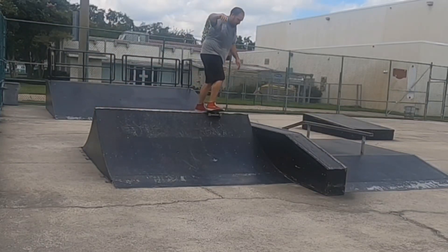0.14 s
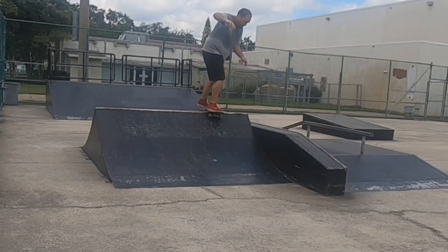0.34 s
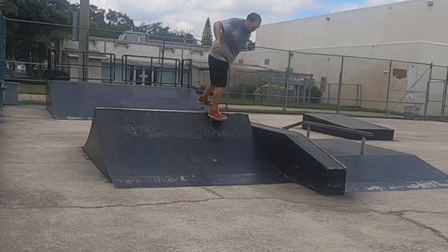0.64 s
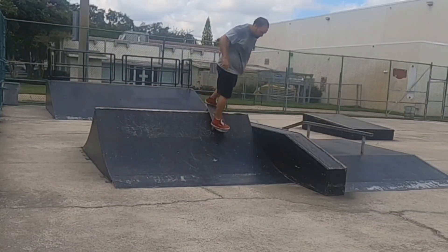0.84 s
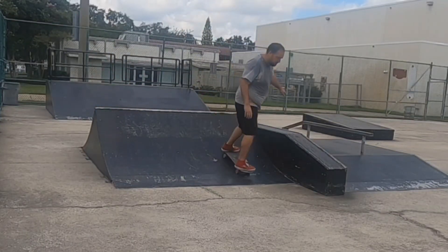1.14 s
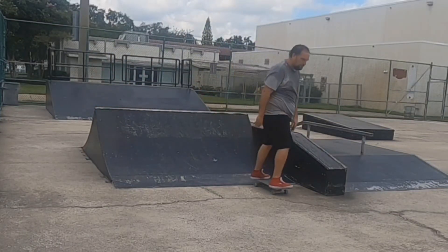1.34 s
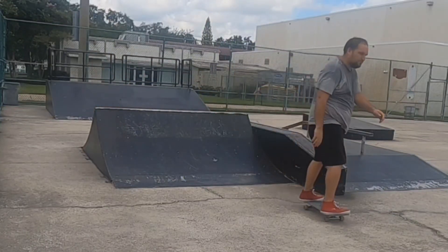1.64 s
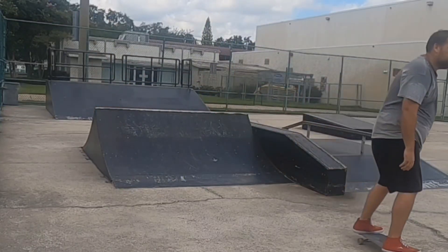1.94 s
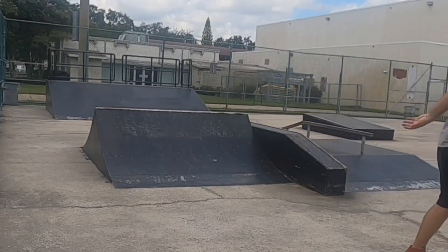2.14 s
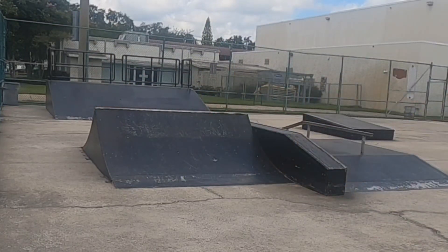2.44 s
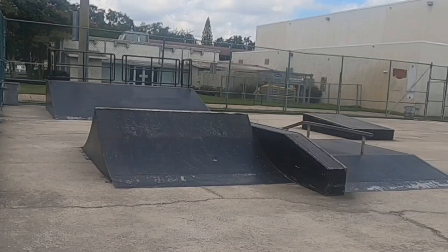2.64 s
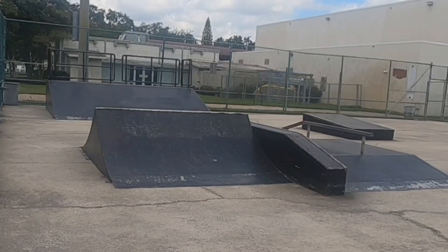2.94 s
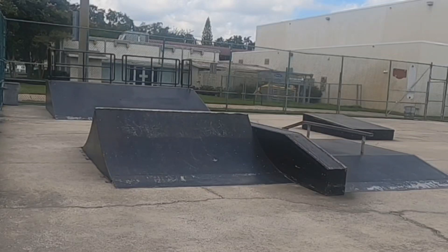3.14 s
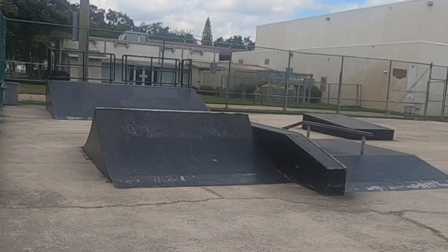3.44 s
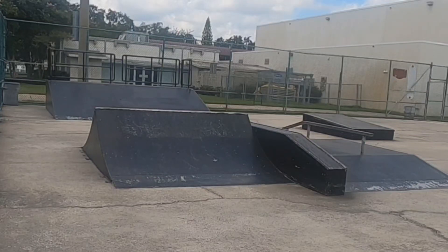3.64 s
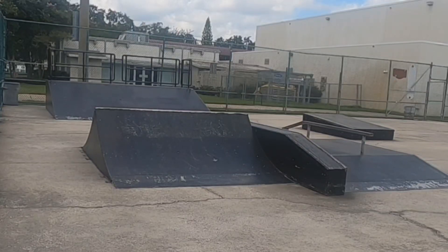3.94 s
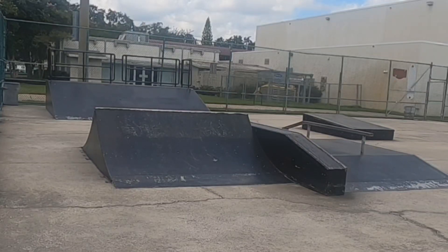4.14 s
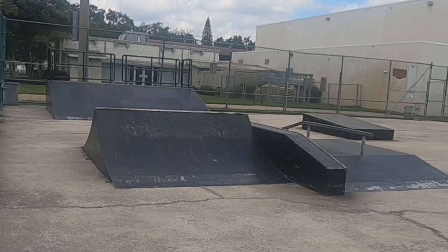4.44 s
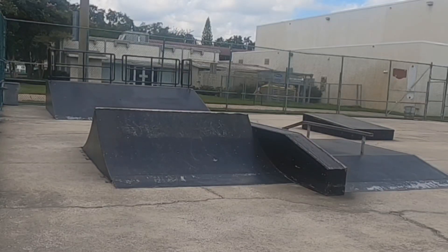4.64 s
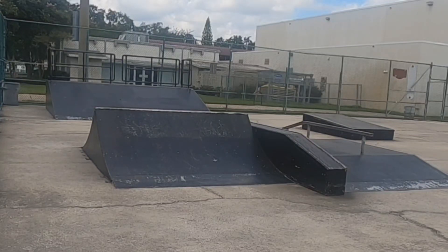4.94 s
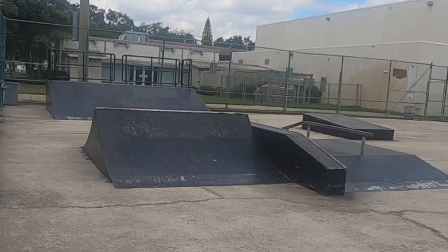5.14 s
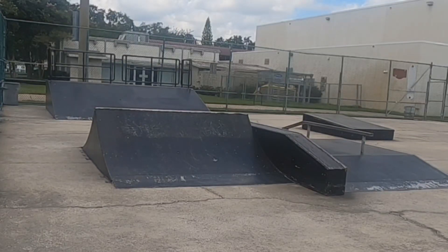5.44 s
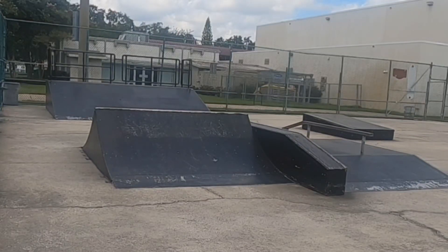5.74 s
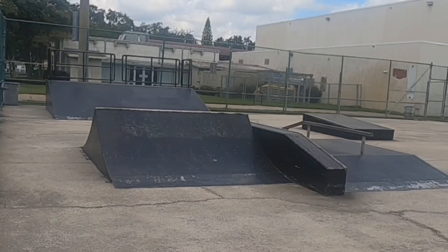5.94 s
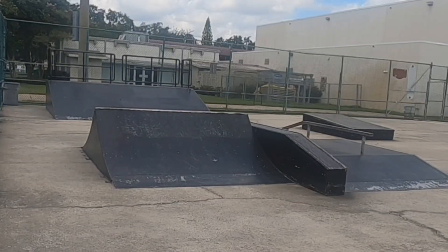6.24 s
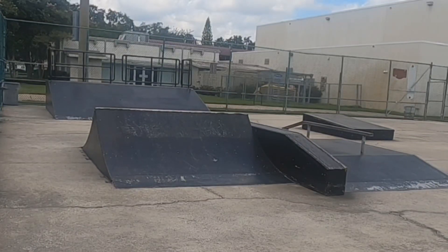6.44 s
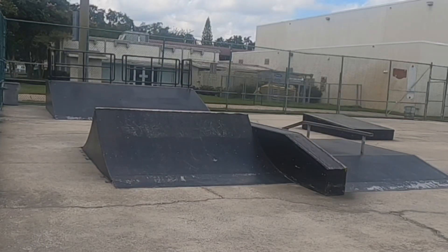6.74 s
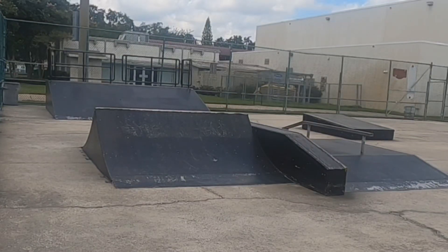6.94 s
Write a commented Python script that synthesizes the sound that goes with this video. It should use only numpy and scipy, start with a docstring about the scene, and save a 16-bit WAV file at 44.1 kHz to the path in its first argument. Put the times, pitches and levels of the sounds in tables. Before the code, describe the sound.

A skateboard taps dryly on a ramp's edge, then drops in with hollow booms and clacks onto rough concrete. Its gritty rumble swells as it passes close to the microphone, bangs over a crack and clatters off. Air-conditioning fans hum steadily behind in the outdoor skatepark. Once the board has gone, a very faint high insect buzz and a slow, low gust of wind join the hum.

```python
"""Dry taps of a skateboard on a ramp's coping. It drops in, booms on the hollow ramp, clacks over its foot
and rumbles close past on rough concrete, then bangs over a crack and clatters off. In each blow the
wheels clack, the metal trucks ring, the deck knocks and the ground thumps. Air-conditioning fans hum
behind; an insect's thin buzz sets in and a slow gust rumbles. A small camera with two close ports
hears it all, its gain control ducking under the loudest blows."""
import sys
import numpy as np
from scipy import signal
from scipy.fft import rfft, irfft, next_fast_len
from scipy.io import wavfile
from scipy.ndimage import uniform_filter1d

SR = 44100
rng = np.random.default_rng(int(sys.argv[2]) if len(sys.argv) > 2 else 0)


def digitize_waveform(pressure):
    """Quantize a signal to 16-bit integers and store it at the path in sys.argv[1].

    Rows of a 2-D input are taken as channels; values are limited to [-1, 1].
    """
    field = np.atleast_2d(pressure).T
    bounded = np.clip(field, -1, 1)
    quanta = np.round(bounded * 32767).astype(np.int16)
    wavfile.write(sys.argv[1], SR, quanta)


N = 313551
TIME = np.arange(N) / SR


# woody knock of the deck: (frequency [Hz], level [dB], t60 [s])
DECK_MODES = [(550, 1.5, 0.037), (690, 4.5, 0.022), (740, -5, 0.03), (918, -7.5, 0.05), (1060, 3.5, 0.013),
              (1204, -0.5, 0.04), (1384, 0, 0.027), (1570, 0.5, 0.017)]
# metallic ring of the trucks: (frequency [Hz], level [dB], t60 [s])
TRUCK_MODES = [(2095, -0.5, 0.028), (2456, 8, 0.018), (3140, -1, 0.035), (3680, 4.5, 0.021),
               (4290, -4, 0.057), (6200, -22, 0.022)]
# bright crack of hard wheels and trucks: (frequency [Hz], level [dB])
CLACK_EQ = [(500, -14), (1300, 6), (2300, 7.5), (3900, 0.5), (5000, -5), (6600, -9.5), (8200, -18.5),
            (11000, -20), (15000, -35)]

def blows(hits, ground_modes, thump_db, knock_octaves, clack_ring_db, truck_db, damping=1,
          contact_s=0.00054, clack_decay_s=0.0016, rattle_db=-13, clack_width_hz=1000):
    """Two quick contacts a blow: wheels crack, trucks ring, the deck knocks, then the ground thumps."""
    knock_lag_s, thump_lag_s, rattle_decay_s = 0.00078, 0.00233, 0.011
    size = 2 ** 13
    out, t = np.zeros(N + size), np.arange(size) / SR
    hz = np.maximum(np.fft.rfftfreq(size, 1 / SR), 1)
    for time_s, lag_s, second_db, knock_db, knock_hz, clack_db, clack_hz in hits:
        # where the board is struck decides which modes speak
        deck_share = bell(np.array(DECK_MODES)[:, :1], knock_hz, knock_octaves) + 0.07
        truck_share = bell(np.array(TRUCK_MODES)[:, :1], clack_hz, octaves=0.42) + 0.041
        # the part that hits lends the crack its own resonance
        resonance = bell(hz, clack_hz, octaves=np.log2(1 + clack_width_hz / clack_hz))
        tint_db = over_hz(CLACK_EQ, size)[0] + clack_ring_db * resonance
        thump = knock = truck = envelope = 0
        for delay, gain in ((0, 1), (lag_s, undb(second_db))):
            age = np.maximum(t - delay, 0)
            thump += gain * ring(ground_modes, np.maximum(age - thump_lag_s, 0), 1)
            knock += gain * ring(DECK_MODES, np.maximum(age - knock_lag_s, 0), deck_share, damping)
            truck += gain * ring(TRUCK_MODES, age, truck_share, damping)
            decay = np.exp(-age / clack_decay_s) + undb(rattle_db) * np.exp(-age / rattle_decay_s)
            envelope += gain * (1 - np.exp(-age / contact_s)) * decay
        burst = envelope * rng.standard_normal(size)
        clack = irfft(rfft(burst) * undb(tint_db)) * (t < t[-1] / 2)
        ground_db = knock_db + thump_db + 1100 * lag_s  # a drawn-out blow thumps more
        layers = (thump, ground_db), (knock, knock_db), (truck, clack_db + truck_db), (clack, clack_db)
        start = int(time_s * SR)
        for layer, db in layers:  # each level is the rms the layer would have if it lasted 10 ms
            out[start:start + size] += undb(db) * layer * np.sqrt(.01 * SR / np.sum(layer ** 2))
    return out[:N]


# boom of the hollow ramp: (frequency [Hz], level [dB], t60 [s])
RAMP_MODES = [(141.4, -1, 0.14), (214, -2, 0.089), (302, -2, 0.049), (505, -2.5, 0.046), (595, 0, 0.023)]
# the board taps the coping: (time [s], other wheel lag [s], other wheel [dB], knock [dB], knock [Hz], clack
# [dB], clack [Hz])
COPING_TAPS = [(.0100, 0.0019, 3.5, -22, 1270, -39, 2000), (.2045, 0.00149, 3, -24, 920, -29, 1900),
               (.2245, 0.00252, 0, -30.5, 1200, -38, 1980)]
# the wheels land on the ramp: (time [s], other wheel lag [s], other wheel [dB], knock [dB], knock [Hz], clack
# [dB], clack [Hz])
RAMP_LANDINGS = [(1.0543, 0.0019, 9, -18.5, 880, -23, 1550), (1.1035, 0.00105, 7, -29.5, 700, -33.5, 5500),
                 (1.208, .0058, 2.5, -19.5, 1280, -26.5, 3620)]

def drop_in():
    """Tight, damped taps on the coping, then landings that set the hollow ramp booming."""
    taps = blows(COPING_TAPS, RAMP_MODES, thump_db=-31, knock_octaves=0.53, clack_ring_db=12,
                 truck_db=-24, damping=2.2)
    landings = blows(RAMP_LANDINGS, RAMP_MODES, thump_db=-5, knock_octaves=0.54, clack_ring_db=6,
                     truck_db=-5, damping=0.85)
    return taps + landings


# thump of the loaded board on concrete: (frequency [Hz], level [dB], t60 [s])
THUMP_MODES = [(95.6, -3.5, 0.14), (155, -4.5, 0.31), (218, 2, 0.13), (261, 1, 0.29), (314, -8.5, 0.1),
               (397, 2.5, 0.099), (460, 8, 0.021)]
# the wheels clack off the ramp's foot: (time [s], other wheel lag [s], other wheel [dB], knock [dB], knock
# [Hz], clack [dB], clack [Hz])
FOOT_CLACKS = [(1.3615, 0.0029, 0, -33, 480, -22.5, 2730), (1.4396, 0.004, 4, -27.5, 653, -24.5, 2700),
               (1.5402, 0.0065, -16, -27.5, 900, -28, 3220)]
# the wheels bang over the crack, close up: (time [s], other wheel lag [s], other wheel [dB], knock [dB], knock
# [Hz], clack [dB], clack [Hz])
CRACK_BANGS = [(2.5785, 0.0029, 1, -18, 480, -39, 3020), (2.603, 0.0087, 1, -30, 450, -53, 3000),
               (2.678, 0.003, -0.5, -11.5, 680, -19, 6060), (2.764, 0.0055, 0, -11.5, 620, -19.5, 6000),
               (2.792, 0.005, -8, -16, 520, -33, 5000), (2.811, 0.0055, 4, -25.5, 450, -43, 3000)]
# the board clatters over joints further off: (time [s], other wheel lag [s], other wheel [dB], knock [dB],
# knock [Hz], clack [dB], clack [Hz])
JOINT_CLATTER = [(3.1706, 0.0053, 3, -23, 1260, -28.5, 2400), (3.2797, 0.0047, 0, -26, 870, -38, 2470),
                 (3.389, 0.001, 6, -33, 1100, -39.5, 2470)]

def concrete_hits():
    """Wheels strike edges: bright at the ramp's foot, heavy at the crack, thin over the far joints."""
    foot = blows(FOOT_CLACKS, THUMP_MODES, thump_db=-3.5, knock_octaves=0.53, clack_ring_db=7.5,
                 truck_db=-2, damping=0.97, contact_s=0.00026, clack_decay_s=0.0022, clack_width_hz=3300)
    crack = blows(CRACK_BANGS, THUMP_MODES, thump_db=-1, knock_octaves=0.45, clack_ring_db=11.5,
                  truck_db=-16, contact_s=0.0006, clack_width_hz=1400)
    joints = blows(JOINT_CLATTER, THUMP_MODES, thump_db=-39, knock_octaves=0.81, clack_ring_db=8.5,
                   truck_db=-1)
    return foot + crack + joints


# two small ticks of the trucks, then pebbles under the wheels: (time [s], other wheel lag [s], other wheel
# [dB], knock [dB], knock [Hz], snap [dB], snap [Hz])
PEBBLES = [(1.402, .002, -8, -51, 1200, -44, 3400), (1.416, .002, -6, -50, 1200, -41, 3200),
           (1.690, 0.0017, 0, -53, 1200, -44.5, 3800), (1.778, 0.0016, -1, -54, 1200, -47, 4200),
           (2.028, 0.0011, -9, -47, 1200, -39, 4200), (2.3238, 0.0024, -6, -42, 1200, -40.5, 4200),
           (2.536, 0.0037, 2, -24.5, 1090, -34.5, 4000)]

def pebble_snaps():
    """The trucks tick twice, then pebbles snap under the wheels: a very short contact with hardly any rattle."""
    return blows(PEBBLES, THUMP_MODES, thump_db=-9, knock_octaves=0.84, clack_ring_db=8, truck_db=-17,
                 contact_s=0.00019, clack_decay_s=0.00045, rattle_db=-25, clack_width_hz=1900)


# small ticks of the trucks: (time [s], other wheel lag [s], other wheel [dB], knock [dB], knock [Hz], tick
# [dB], tick [Hz])
TRUCK_TICKS = [(.8645, 0.0014, -14, -42, 990, -47, 9000), (3.070, 0.0028, -1, -30, 865, -45, 10000),
               (3.131, 0.0037, 0.5, -30, 1010, -38.5, 10900)]

def truck_ticks():
    """The trucks tick brightly over a light knock of the deck."""
    return blows(TRUCK_TICKS, THUMP_MODES, thump_db=-28, knock_octaves=0.39, clack_ring_db=10,
                 truck_db=-20, clack_width_hz=3500)


# low body of the rolling wheels: (frequency [Hz], level [dB])
RUMBLE_EQ = [(40, -26), (90, -1), (160, 3.5), (260, 4), (340, 2), (450, 1.5), (620, -7), (800, -7),
             (1200, -8.5), (1800, -39), (4000, -73)]
# crunch of crushed grit: (frequency [Hz], level [dB])
GRIT_EQ = [(500, 1), (1100, 9), (1800, 5), (3000, 5.5), (4300, 1), (5600, -8), (7000, -9), (8700, -18),
           (10500, -15.5), (13000, -22), (15000, -36)]

def rolling(throb, flutter, speed_m_s=3.8, passes_s=2.636, closest_m=1.68, grains_per_s=1700):
    """Wheels whirr on the ramp, drum on rough ground and crush grit, swelling as the board nears."""
    distance_m = np.hypot(speed_m_s * (TIME - passes_s), closest_m)
    on_ramp = swell(start_s=0.42, attack_s=0.6, hold_s=0.31, release_s=0.063)
    on_concrete = np.clip((TIME - 1.24) / 0.069, 0, 1)
    roughness = undb(-1.5) * on_ramp + on_concrete  # the ramp is smoother
    behind = undb(-17 * np.maximum(TIME - passes_s, 0))  # fades once behind the camera
    ride = roughness / distance_m * behind
    sizes = undb(5 * np.minimum(rng.exponential(size=N), 4))
    grains = (rng.random(N) < grains_per_s / SR) * rng.choice([-1, 1], N) * sizes
    rumble = noise(RUMBLE_EQ) * undb(-22.5) * ride
    grit = colour(unit(grains) + 1.1 * rng.standard_normal(N), GRIT_EQ) * undb(-35.5) * ride
    whirr = resonant_noise(hz=1400, half_width_hz=1000) * undb(-43) * on_ramp
    return rumble * throb + (grit + whirr) * flutter


# low shudder of the board: (frequency [Hz], level [dB])
SHUDDER_EQ = [(40, -26), (90, -5), (160, -1), (255, 5), (330, 3), (410, 2.5), (520, -1.5), (700, -5),
              (1000, -13), (1800, -37), (4000, -73)]

def board_shudder():
    """The crack sets the board shuddering and leaves a hollow ring."""
    shaking = undb(-19) * swell(start_s=2.56, attack_s=0.12, hold_s=0.15, release_s=0.068)
    ringing = undb(-27) * swell(start_s=2.78, attack_s=0.077, hold_s=0.12, release_s=0.057)
    return noise(SHUDDER_EQ) * shaking + resonant_noise(hz=670, half_width_hz=250) * ringing


# rasp of sliding wheels: (frequency [Hz], level [dB])
SCRAPE_EQ = [(500, -9), (1100, 8), (2000, 5), (4300, 7), (6000, -9), (8700, -14), (10500, -5), (15000, -32)]

def wheel_scrape():
    """The wheels scrape sideways on the way up to the crack."""
    return noise(SCRAPE_EQ) * undb(-42) * swell(start_s=2.39, attack_s=0.11, hold_s=0.094, release_s=0.045)


def bearings():
    """The bearings sizzle faintly as the board rocks on the coping, passes and coasts off."""
    rocking = undb(-13) * swell(start_s=0, attack_s=0.04, hold_s=0.21, release_s=0.2)
    passing = swell(start_s=1, attack_s=1.55, hold_s=0.16, release_s=0.07)
    coasting = undb(2) * swell(start_s=2.82, attack_s=0.27, hold_s=0.03, release_s=0.076)
    sizzle = noise([(4000, -18), (8500, -5), (10200, 0), (12500, -6), (15000, -14)])
    return undb(-61 + 3 * drift(70)) * sizzle * (rocking + passing + coasting)


def skateboard():
    """The whole board: blows on top of rolling and shudder, which throb with the same bumps."""
    hits = drop_in() + concrete_hits() + pebble_snaps() + truck_ticks()
    bumps = drift(rate_hz=45.13)
    throb, flutter = undb(1.64 * bumps), undb(0.8 * bumps)
    return hits + rolling(throb, flutter) + board_shudder() * throb + wheel_scrape() + bearings()


# fader ride of the fan hum: (time [s], level [dB])
HUM_FADER = [(0, -36.5), (.45, -32), (2.85, -33.5), (3, -36), (3.95, -43.5), (4.2, -38), (6, -30),
             (7.1, -30.5)]

def fan_hum(blade_hz=146.77, beat_s=5.34, beat_peak_s=4.36):
    """A wavering blade tone whose octave slowly waxes and wanes."""
    phase = 2 * np.pi * np.cumsum(blade_hz + 0.5 * drift(5.9)) / SR
    blade = np.sin(phase) * undb(1.53 * drift(11))
    beat = np.cos(2 * np.pi * (TIME - beat_peak_s) / beat_s)
    octave = np.sin(2 * phase + 0.71 * drift(9.7)) * undb(-8 + 5.5 * beat)
    return np.sqrt(2) * (blade + octave) * fader(HUM_FADER)


# faint fan and compressor tones: (frequency [Hz], width [Hz], level [dB])
MACHINE_TONES = [(105, 5, -57), (216.5, 4.1, -46.5), (319.8, 1.8, -47), (431.7, 2.4, -52.5),
                 (440.8, 12, -50), (727.6, 13, -53.5), (857, 5.4, -51.5), (906, 1.6, -51.5),
                 (968.7, 13, -49.5), (1065, 6.3, -50.5), (1188, 3.8, -56), (1313, 7.3, -56.5),
                 (1403, 7.6, -64), (1489, 4.9, -53), (1524, 5.7, -67), (2198, 5.8, -58), (2147, 150, -52),
                 (2356, 6.6, -58), (5320, 77, -81), (5640, 55, -81)]
# airy bed of fans and town: (frequency [Hz], level [dB])
AIR_EQ = [(20, -4.5), (38, -3.5), (60, 2), (85, -1), (112, 5), (170, -3.5), (240, -2), (380, -6.5),
          (500, -7), (660, -13), (980, -6), (1300, -12), (1800, -15), (2300, -17.5), (3200, -20),
          (4800, -36.5), (6300, -43), (8300, -50), (11500, -54.5), (15000, -81)]
# fader ride of the fans' rush: (time [s], level [dB])
RUSH_FADER = [(0, -2), (4.2, 1), (7.1, 0.5)]

def fan_rush():
    """Broad rushing air, with machine tones singing in it as narrow bands of noise."""
    size = next_fast_len(N)
    response = sum(undb(db) * narrow(hz, width / 2, size) for hz, width, db in MACHINE_TONES)
    tones = irfft(rfft(rng.standard_normal(size)) * response, size)[:N]
    air = noise(AIR_EQ) * undb(-32.5 + 0.5 * drift(5))
    return (tones + air) * fader(RUSH_FADER)


def insect(start_s=2.6, rise_s=0.96, start_hz=9950, creep_hz_per_s=45, upper_hz=13700, strokes_hz=72):
    """A distant buzz fades in: each wing stroke swells and arches in pitch; foliage blurs it."""
    age = np.maximum(TIME - start_s, 0)
    stroke = np.cos(2 * np.pi * np.cumsum(strokes_hz + 0.5 * drift(5)) / SR)
    bend_hz = 220 * stroke + 70 * drift(600)
    main = np.sin(2 * np.pi * np.cumsum(start_hz + creep_hz_per_s * age + bend_hz) / SR)
    upper = np.sin(2 * np.pi * np.cumsum(upper_hz + bend_hz / 2) / SR)
    buzz = (main + undb(-16) * upper) * undb(6 * stroke)
    foliage = signal.fftconvolve(buzz, noise_tail(t60_s=0.058))[:N]
    blurred = unit(unit(buzz) + undb(-5) * unit(foliage))
    return undb(-69.5) * (1 - np.exp(-age / rise_s)) * blurred


def breeze(peak_s=6.5, peak_db=-32, slope_db_per_s=5.5, right_db=-17):
    """One slow gust builds and eases; it rumbles mostly on the left port."""
    eq = [(10, -26), (38, 5), (70, 0), (110, -5), (200, -12), (400, -28), (4000, -80)]
    gust = undb(peak_db - slope_db_per_s * np.abs(TIME - peak_s))
    return np.array([noise(eq), noise(eq) * undb(right_db)]) * gust


def hiss():
    """A faint diffuse hiss, different at each port."""
    eq = [(1000, 5), (3500, 8), (5000, -3), (6500, -6), (8500, -13), (11000, -31), (13000, -23),
          (15000, -40)]
    return undb(-61) * np.array([noise(eq), noise(eq)])


def park_echoes(x):
    """Nearby ramps scatter the sound briefly; distant walls return a faint dull tail."""
    early = noise_tail(t60_s=0.04) * (TIME[:SR] > .006)
    far = noise_tail(t60_s=0.28) * (TIME[:SR] > .04)
    far = signal.sosfilt(signal.butter(2, 3500, fs=SR, output="sos"), far / np.linalg.norm(far))
    echoes = undb(-15) * early / np.linalg.norm(early) + undb(-21) * far
    return x + signal.fftconvolve(x, echoes)[:N]


# stereo image of the two ports: (frequency [Hz], left minus right [dB], phase lead of left [rad])
PORT_IMAGE = [(40, 30, 3), (85, 38, -2), (138, 5.5, -1.5), (260, 0, -1.5), (740, -4, -1.5),
              (1200, 0, -1.62), (1850, -3, -1.8), (2700, -1.5, -1), (4120, 5.5, -1.3), (5950, 3.5, -1.5),
              (7700, 12.5, -2), (11500, -13, -1.5), (14900, -3, -2)]

def ports(x, scatter_db, gain_db=3, scatter_hz=7000, scatter_s=0.0018):
    """Two close ports hear the same sound with their own colour and phase; the bass lies on the left."""
    size = next_fast_len(N + SR)
    balance_db, lead = over_hz(PORT_IMAGE, size)
    left = undb(balance_db) * np.exp(.5j * lead)
    right = np.exp(-.5j * lead)
    pair = np.array([left, right]) * np.sqrt(2 / (1 + undb(balance_db) ** 2))
    # short waves scatter off the ground and reach each port differently
    paths = rng.standard_normal((2, 2 ** 11)) * np.exp(-TIME[:2 ** 11] / scatter_s)
    paths /= np.linalg.norm(paths, axis=1, keepdims=True)
    treble = 1 / np.sqrt(1 + (scatter_hz / np.maximum(np.fft.rfftfreq(size, 1 / SR), 1)) ** 3)
    pair += undb(scatter_db) * treble * rfft(paths, size)
    return undb(gain_db) * irfft(rfft(x, size) * pair, size)[:, :N]


def gain_control(x, threshold_db, slope, window_s, release_db_per_s, lag_s=0):
    """Loud passages pull the gain down; it comes back at a steady rate."""
    size = int(window_s * SR)
    power = signal.lfilter([1 / size], [1, 1 / size - 1], np.mean(x ** 2, axis=0))
    over_db = slope * np.maximum(10 * np.log10(power + 1e-12) - threshold_db, 0)
    recovery_db = release_db_per_s * TIME
    gain_db = recovery_db - np.maximum.accumulate(over_db + recovery_db)
    return x * undb(np.interp(TIME - lag_s, TIME, gain_db))


def ring(modes, t, gains, damping=1, rise_s=0.00041):
    """Decaying modes that take a moment to build; each contact excites them a little differently."""
    hz, db, t60 = np.transpose(modes)[:, :, None]
    detune, scatter = rng.standard_normal((2, len(modes), 1))
    sign = rng.choice([-1, 1], (len(modes), 1))
    decay = np.exp(-np.log(1000) * damping * t / t60)
    waves = np.sin(2 * np.pi * hz * (1 + 0.031 * detune) * t) * decay
    return np.sum(sign * gains * undb(db + 0.5 * scatter) * waves, axis=0) * (1 - np.exp(-t / rise_s))


def undb(db):
    """Decibels to gain."""
    return 10 ** (np.asarray(db) / 20)


def unit(x):
    """Scale to rms 1."""
    return x / np.sqrt(np.mean(x ** 2))


def fader(points):
    """Gain per sample from (time [s], level [dB]) points."""
    return undb(np.interp(TIME, *np.transpose(points)))


def swell(start_s, attack_s, hold_s, release_s):
    """A gain that rises to 1, holds and dies away exponentially."""
    rise = np.clip((TIME - start_s) / attack_s, 0, 1)
    return rise * np.exp(-np.maximum(TIME - start_s - attack_s - hold_s, 0) / release_s)


def drift(rate_hz):
    """Smooth random wander; rms 1."""
    steps = rng.standard_normal(int(N / SR * rate_hz) + 2)
    path = np.interp(TIME * rate_hz, np.arange(len(steps)), steps)
    return unit(uniform_filter1d(path, int(SR / rate_hz / 2) + 1))


def over_hz(table, size):
    """The columns of a frequency table, one value per FFT bin."""
    hz, *columns = np.transpose(table)
    bins = np.maximum(np.fft.rfftfreq(size, 1 / SR), 1)
    return [np.interp(np.log(bins), np.log(hz), c) for c in columns]


def colour(x, eq):
    """Filter by (frequency [Hz], level [dB]) points; rms 1."""
    size = next_fast_len(len(x))
    return unit(irfft(rfft(x, size) * undb(over_hz(eq, size)[0]), size)[:len(x)])


def noise(eq):
    """Noise shaped by an EQ curve; rms 1."""
    return colour(rng.standard_normal(N), eq)


def noise_tail(t60_s):
    """One second of decaying noise."""
    return rng.standard_normal(SR) * np.exp(-np.log(1000) * TIME[:SR] / t60_s)


def bell(hz, centre_hz, octaves):
    """Bell-shaped weight on a log-frequency axis."""
    return np.exp(-.5 * (np.log2(hz / centre_hz) / octaves) ** 2)


def narrow(hz, half_width_hz, size):
    """Amplitude response of one resonance; mean power 1."""
    return unit(1 / (1 + ((np.fft.rfftfreq(size, 1 / SR) - hz) / half_width_hz) ** 2))


def resonant_noise(hz, half_width_hz):
    """Noise ringing in one resonance; rms near 1."""
    size = next_fast_len(N)
    return irfft(rfft(rng.standard_normal(size)) * narrow(hz, half_width_hz, size), size)[:N]


def scene():
    """The board up front, fans and insect behind, over a floor of hiss and wind."""
    floor = hiss()
    board = ports(park_echoes(skateboard()), scatter_db=-7)
    background = ports(fan_hum() + fan_rush() + insect(), scatter_db=-23)
    return board + background + floor + breeze()


def record(dry, ceiling=0.92, top_hz=15000):
    """The camera rides the gain, dips it briefly after loud blows, rounds the peaks and cuts the top."""
    ridden = gain_control(dry, threshold_db=-18, slope=0.59, window_s=0.011, release_db_per_s=5)
    limited = gain_control(ridden, threshold_db=-21.5, slope=0.31, window_s=0.01, release_db_per_s=52,
                           lag_s=0.014)
    rounded = limited / (1 + (limited / ceiling) ** 6) ** (1 / 6)
    return signal.sosfilt(signal.ellip(8, .2, 70, top_hz, fs=SR, output="sos"), rounded)


dry = scene()
out = record(dry)
digitize_waveform(out)
```